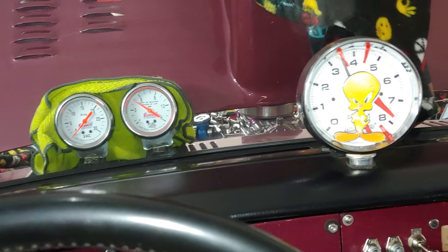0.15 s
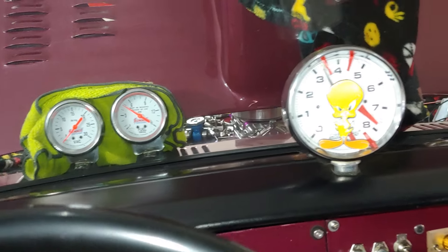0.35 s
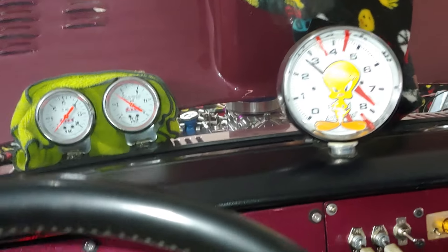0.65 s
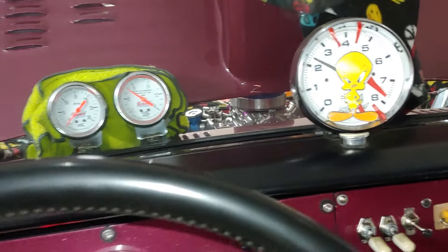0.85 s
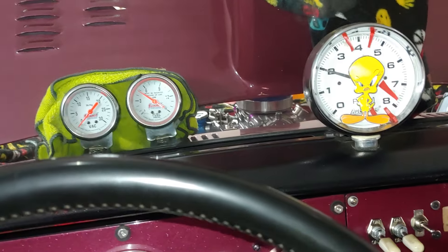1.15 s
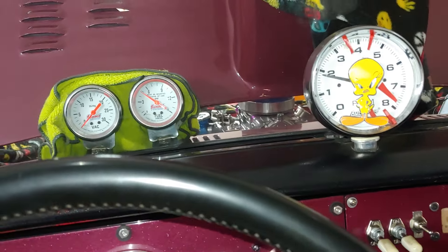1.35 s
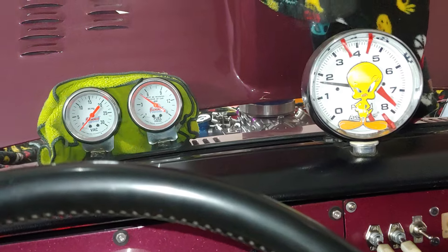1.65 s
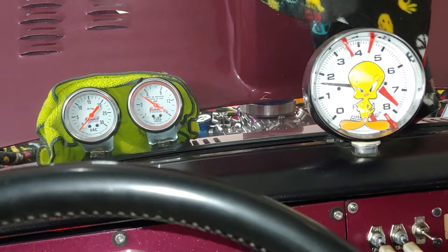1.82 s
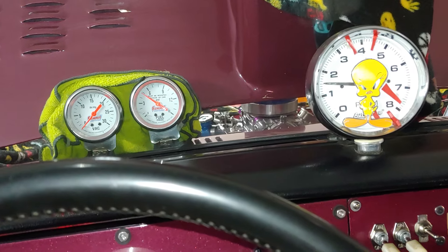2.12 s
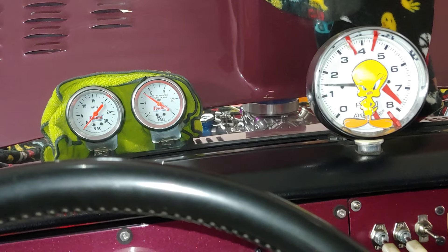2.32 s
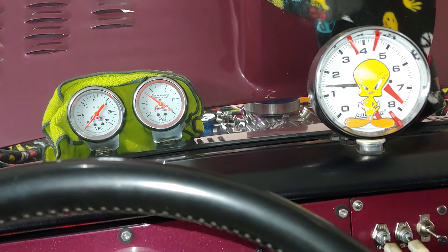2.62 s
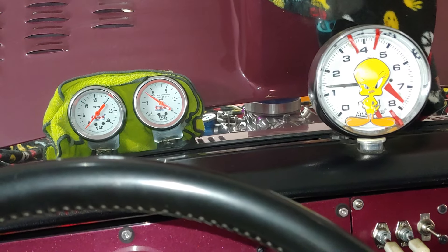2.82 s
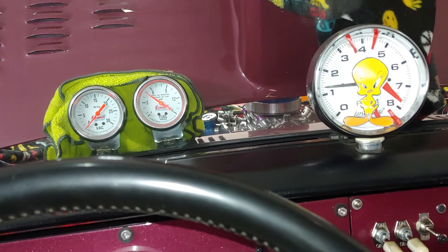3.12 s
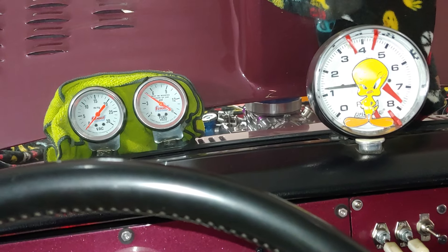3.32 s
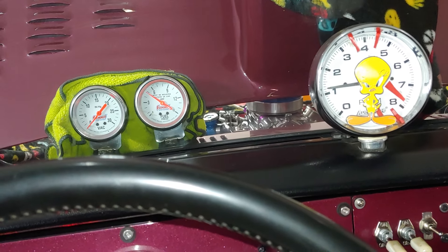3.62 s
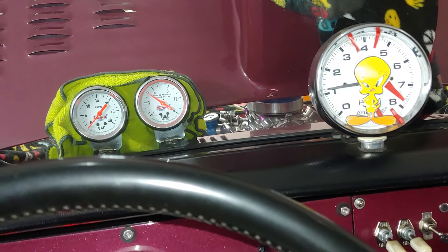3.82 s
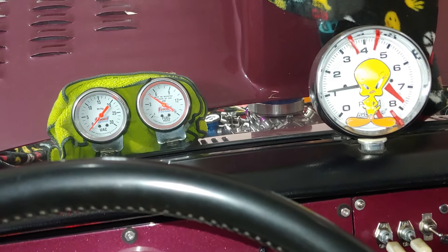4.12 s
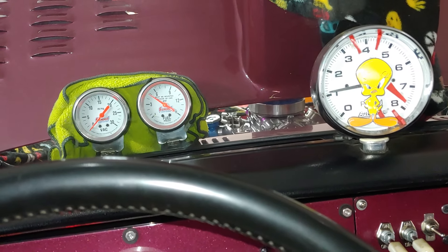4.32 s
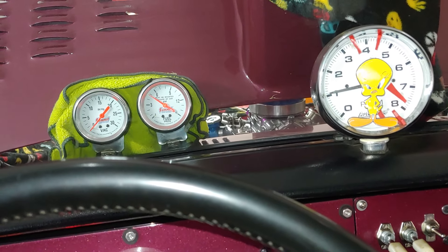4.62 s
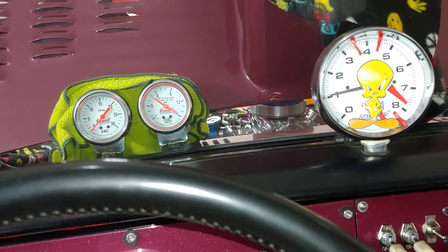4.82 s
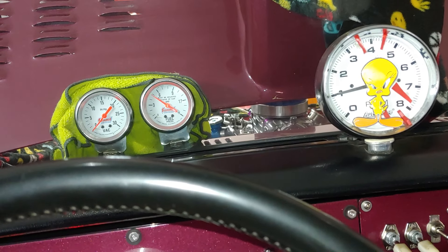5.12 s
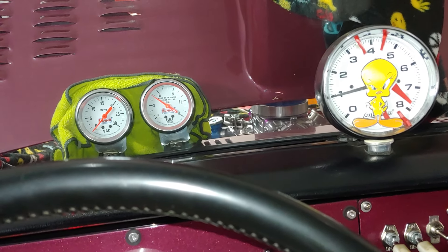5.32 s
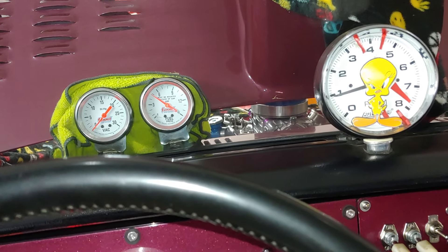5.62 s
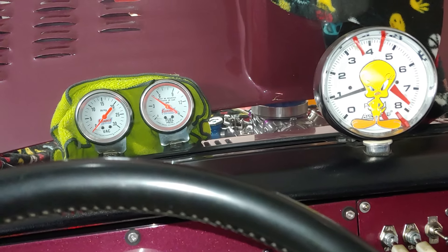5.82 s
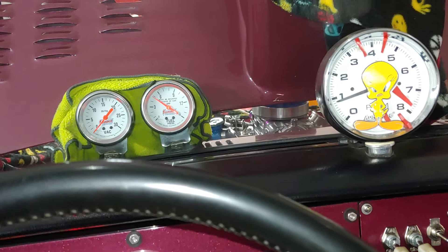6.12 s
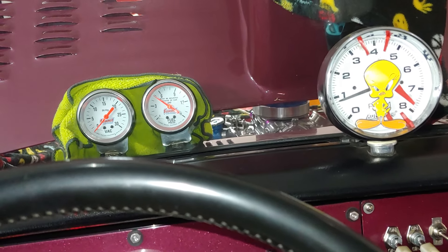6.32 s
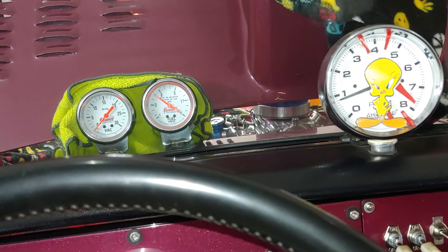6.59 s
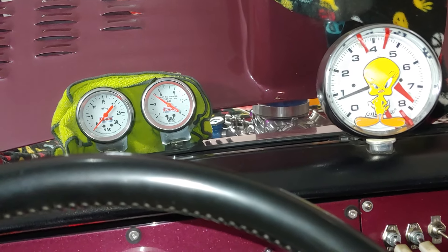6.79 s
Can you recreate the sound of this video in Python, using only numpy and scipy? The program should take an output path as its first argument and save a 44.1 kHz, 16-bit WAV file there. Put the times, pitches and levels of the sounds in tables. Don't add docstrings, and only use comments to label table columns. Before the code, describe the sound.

A rough eight-cylinder engine is blipped, falls in deep uneven throbs with sputtering backfires, and settles into a lumpy idle with rattling dash parts.

```python
import sys
import numpy as np
from scipy import signal
from scipy.fft import rfft, irfft, next_fast_len
from scipy.io import wavfile
from scipy.ndimage import uniform_filter1d

SR = 44100
rng = np.random.default_rng(int(sys.argv[2]) if len(sys.argv) > 2 else 0)


def makeup_ratio(level_db):
    decades = np.asarray(level_db, float) / 20
    return 10 ** decades


def unload_wav(signal):
    wavfile.write(
        sys.argv[1],
        SR,
        np.round(np.clip(np.atleast_2d(signal).T, -1, 1) * 32767).astype(np.int16),
    )


N = 306495


def unit(x):
    return x / np.sqrt(np.mean(x ** 2))


def band(x, f_hz, width_hz):
    return signal.lfilter(*signal.iirpeak(f_hz, f_hz / width_hz, fs=SR), x)


def resonate(x, modes):
    out = 0
    for k, (f_hz, width_hz, level_db) in enumerate(modes):
        out = out + (-1) ** k * makeup_ratio(level_db) * band(x, f_hz, width_hz)
    return out


def shelf(x, f_hz, kind, order=2):
    return signal.sosfilt(signal.butter(order, f_hz, kind, fs=SR, output="sos"), x)


def colour(x, points):
    f_hz, gain_db = np.transpose(points)
    size = next_fast_len(N)
    log_f = np.log(np.arange(size // 2 + 1) * SR / size + 1)
    gain = makeup_ratio(np.interp(log_f, np.log(f_hz), gain_db))
    return irfft(rfft(x, size) * gain, size)[:N]


def walk(rate_hz):
    hold = int(SR / rate_hz)
    steps = np.repeat(rng.standard_normal(N // hold + 1), hold)
    return 1.48 * uniform_filter1d(uniform_filter1d(steps, hold), hold)[:N]


def strikes(at_s, level_db):
    out = np.zeros(N)
    np.add.at(out, (np.asarray(at_s) * SR).astype(int), makeup_ratio(level_db))
    return out


def ring(f_hz, t60_s):
    t = np.arange(SR // 2) / SR
    return np.sin(2 * np.pi * f_hz * t) * (1 - np.exp(-t / 0.0013)) * makeup_ratio(-60 * t / t60_s)


def rattles(shake):
    # t/s, peak level/dB
    tick_table = [(3.5772, -18.5), (3.7713, -23), (3.9683, -34), (4.3629, -25), (4.6962, -23),
                  (4.9117, -17), (5.0384, -20), (5.2379, -21), (5.427, -34), (5.4614, -13), (5.5946, -23),
                  (5.869, -43), (5.887, -11.5), (5.9458, -21), (6.1429, -10.5), (6.2531, -17),
                  (6.309, -19.5), (6.3569, -33.5), (6.4113, -22), (6.4327, -18), (6.4936, -19),
                  (6.544, -18.5), (6.6397, -11), (6.6966, -15), (6.7245, -18.5), (6.7445, -13.5),
                  (6.7759, -35), (6.8318, -36), (6.8508, -26), (6.9006, -11.5)]
    # t/s, peak level/dB, f/Hz
    ping_table = [
        (4.92, -48, 3620),
        (5.14, -43, 3620),
        (5.37, -44, 3620),
        (6.14, -45, 3530),
        (6.63, -46, 3620),
    ]
    chatter = (rng.random(N) < 120 / SR) * rng.standard_normal(N) * shake * makeup_ratio(-8.0)
    blows = strikes(*np.transpose(tick_table)) + chatter
    bracket = ring(2045., 0.083) + .5 * ring(2120., 0.04)
    ticks = signal.fftconvolve(blows, bracket)[:N]
    pings = np.zeros(N)
    for at_s, level_db, f_hz in ping_table:
        pings += signal.fftconvolve(strikes([at_s], level_db), ring(f_hz, 0.41))[:N]
    return ticks * makeup_ratio([[-14], [-6]]) + pings


def spits(column, rise_ms, fall_ms):
    # t/s, treble peak level/dB, body over peak/dB, panel ring over peak/dB
    spit_table = np.array([(0.661, -28, 3, -12), (1.18, -35, -7, -8), (1.4007, -35, -1, 9),
                           (1.589, -31.5, 21, -1), (2.115, -26, 14, -24), (2.429, -37, 12, -14),
                           (2.598, -26, 7, 7.5), (2.8665, -31, 16, 6), (3.118, -27, -4, 3),
                           (3.1874, -27, -4, -19), (3.3704, -25.5, 3, -3), (3.7589, -23.5, -1, 1.5),
                           (3.8462, -38.5, -2.5, -6), (3.966, -24, 2.5, 0), (4.357, -27.5, -10, -12),
                           (4.699, -27.5, -5, -6.5), (4.9117, -27.5, 6.5, 4.5), (5.1374, -29, 0, 6),
                           (5.2326, -30, -10.5, -2), (5.684, -35, 7, -15), (5.869, -20, -9, -11),
                           (5.975, -27, 14, -5), (6.135, -24, 17, 4.5), (6.299, -28, 14, -6),
                           (6.4107, -18, -3, 4.5), (6.4991, -27.5, 0, -3), (6.601, -15, 5.5, -0.5),
                           (6.659, -26.5, -11, 3), (6.728, -33, -2, -4), (6.857, -38, -7, -17)])
    level_db = spit_table[:, 1] + (spit_table[:, column] if column else 0)
    ms = np.arange(SR // 6) / SR * 1000
    puff = (1 - np.exp(-ms / rise_ms)) * np.exp(-(ms / fall_ms) ** 2)
    return signal.fftconvolve(strikes(spit_table[:, 0], level_db), puff)[:N]


def port(points, body, treble, shake, shared):
    # f/Hz, width/Hz, level/dB
    panel_modes = [(718, 26, 0), (900, 45, -2), (975, 40, -3), (1280, 60, -7), (1740, 140, -4),
                   (2030, 60, -3), (2375, 55, -6), (2800, 60, -6), (3390, 50, -9), (4020, 50, -8)]
    air = rng.standard_normal(N)
    common = shelf(shared + .5 * air, 416.0, "lowpass")
    air = shelf(air, 263.0, "highpass") + common + 0.14 * shared
    low = shelf(air * body, 5000., "lowpass", order=1) * makeup_ratio(walk(30))
    high = shelf(air * treble, 8200.0, "highpass", order=1) * makeup_ratio(walk(10))
    panels = resonate((shared + 0.41 * air) * shake, panel_modes)
    return colour(low + high + makeup_ratio(4) * panels, points) * makeup_ratio(56.5)


def firings(rate_hz, imbalance):
    bank_signs = np.array([1, -1, -1, 1, -1, 1, 1, -1])
    turns = np.cumsum(rate_hz) / SR
    count = np.arange(int(turns[-1]))
    jitter, luck = rng.standard_normal((N // 100, 2))[count].T
    at = np.interp(count + .025 * jitter, turns, np.arange(N)).astype(int)
    strength = makeup_ratio(2.0 * luck)
    share = np.clip(imbalance[at], 0, 1)
    balance = (1 - share + share * bank_signs[count % 8]) / np.hypot(share, 1 - share)
    pulses = np.zeros(N)
    np.add.at(pulses, at, strength * balance)
    latest = strength[np.minimum(turns.astype(int), count[-1])]
    gate = latest ** 0.33 * (0.64 + .5 * np.exp(-(turns % 1) / 0.19))
    return pulses / np.sqrt(rate_hz), gate


def exhaust(pulses, upper_db):
    # f/Hz, width/Hz, level/dB
    pipe_modes = [(133.3, 58.8, 8), (185.3, 31.2, 8), (229, 17.5, -8), (304.2, 17.5, -6),
                  (360.4, 20.3, -13.5), (422, 70, -17)]
    drive = unit(pulses) + 0.45 * rng.standard_normal(N)
    lower = shelf(resonate(drive, pipe_modes[:2]), 105.6, "highpass", order=6)
    upper = shelf(resonate(drive, pipe_modes[2:]), 170.0, "highpass", order=4)
    t = np.arange(SR // 5) / SR
    both, apart = rng.standard_normal((2, len(t))) * makeup_ratio(-60 * t / .22)
    both[0] = 45
    ports = []
    for side in (1, -1):
        cab = both + side * 0.38 * apart
        low = unit(signal.fftconvolve(lower, cab)[:N])
        high = unit(signal.fftconvolve(upper, cab)[:N])
        low = shelf(low, 238.0, "lowpass", order=4)
        ports.append(low + makeup_ratio(upper_db) * shelf(high, 312.0, "lowpass"))
    return np.array(ports)


def kick(t, at_s, level_db, f_hz, length_ms, phase):
    near = slice(max(int((at_s - .15) * SR), 0), int((at_s + .15) * SR))
    late_s = t[near] - at_s
    width_s = length_ms / 1000 * np.where(late_s < 0, .7, 1.3)
    envelope = np.exp(-(late_s / width_s) ** 2)
    out = np.zeros(N)
    out[near] = makeup_ratio(level_db) * envelope * np.cos(2 * np.pi * f_hz * late_s + phase)
    return out


def rumble(f_hz, width_hz):
    return unit(band(band(rng.standard_normal(N), f_hz, width_hz), f_hz, width_hz))


def boom(t, rate_hz):
    # f/Hz, peak level/dB
    cab_points = [(50, -15.5), (60, -8.5), (67, -8.5), (73, -2.5), (84, -2.5), (92, -6), (100, -19),
                  (112, -50)]
    # t/s, peak level/dB, f/Hz, length/ms
    thump_table = [(0.192, -6.1, 78, 22), (0.345, -10.5, 84, 60), (0.442, -6.1, 78, 60),
                   (0.546, -6.3, 78, 32), (0.704, -3.7, 78, 32), (0.862, -9.4, 57, 32),
                   (0.875, -6.8, 75, 60), (0.999, -6.2, 54, 22), (1.022, -5.3, 81, 60),
                   (1.052, -12.4, 75, 60), (1.06, -11.9, 87, 45), (1.241, -5.8, 72, 60),
                   (1.308, -8.9, 81, 45), (1.414, -4.3, 84, 32), (1.447, -10.7, 69, 60),
                   (1.5, -4.8, 87, 45), (1.629, -12.4, 72, 60), (1.636, -1.3, 81, 45),
                   (1.752, -0.8, 78, 45), (1.875, -5.5, 81, 45), (1.969, -10.8, 84, 60),
                   (2.01, -1.6, 78, 60), (2.039, -12.6, 75, 60), (2.218, -3.3, 75, 60),
                   (2.308, -6.0, 69, 45), (2.458, -9.0, 90, 32), (2.458, -6.2, 72, 60),
                   (2.582, -8.0, 78, 45), (2.67, -10.1, 87, 60), (2.697, -6.1, 75, 60)]
    # t/s, peak level/dB, f/Hz
    kick_table = [(2.88, -6.7, 75), (2.938, -11.5, 84), (3.063, -9.3, 72), (3.201, -6.5, 69),
                  (3.42, -9.4, 69), (3.998, -10.8, 72), (4.803, -12.5, 87), (4.931, -12.1, 81),
                  (5.185, -7.8, 81), (5.466, -11.6, 51), (5.478, -8.5, 81), (5.533, -7.4, 75),
                  (5.616, -10.4, 72), (5.713, -8.2, 78), (5.786, -5.6, 78), (5.887, -10.2, 57),
                  (5.976, -11.6, 63), (6.101, -12.5, 81), (6.154, -4.5, 75), (6.204, -11.1, 81),
                  (6.323, -4.8, 72), (6.372, -8.1, 81), (6.427, -6.1, 69), (6.527, -11.9, 60),
                  (6.638, -7.8, 69), (6.701, -3.5, 81), (6.864, -2.7, 78), (6.898, -8.1, 54),
                  (6.924, -5.2, 81), (6.944, -5, 75)]
    # t/s, peak level/dB, f/Hz
    misfire_table = [(2.806, -11.3, 84), (2.995, -8.8, 81), (3.107, -7.4, 75), (3.303, -11.9, 75),
                     (3.361, -9.3, 72), (3.637, -12.4, 69), (4.087, -10.7, 75), (4.82, -11.9, 66),
                     (4.98, -7.3, 84), (5.051, -6.7, 87), (5.229, -12.0, 87), (5.324, -11.2, 87),
                     (5.42, -11.1, 78), (5.576, -3.6, 75), (5.681, -2.6, 81), (5.748, -11.2, 63),
                     (5.924, -7.4, 69), (6.018, -4.6, 78), (6.063, -7.1, 81), (6.241, -5.6, 78),
                     (6.38, -10.1, 51), (6.56, -7.0, 69), (6.594, -10.3, 81), (6.778, -11.4, 69),
                     (6.822, -10.7, 54)]
    kick_ms, thump_db = 22, 0.5
    shell_db, lump_db, rumble_db = -15, -16.5, -36.5
    duck_share = 0.95

    phase = 2 * np.pi * np.cumsum(rate_hz) / SR
    cab_hz, cab_db = np.transpose(cab_points)
    tone = makeup_ratio(np.interp(np.log(rate_hz), np.log(cab_hz), cab_db))
    air = tone * np.cos(phase)
    for row in thump_table:
        air = air + makeup_ratio(thump_db) * kick(t, *row, 0.)
    for table, turn in ((kick_table, 0.), (misfire_table, np.pi)):
        for row in table:
            air = air + kick(t, *row, kick_ms, phase[int(row[0] * SR)] + turn)
    shell = rumble(47.6, 20.0) * uniform_filter1d(np.abs(air), size=6000) * np.pi / 2
    loose = np.clip(1 - duck_share * tone, 0, 1)
    lumps = makeup_ratio(shell_db) * shell + makeup_ratio(lump_db) * rumble(74.4, 26.7)
    return air + loose * lumps + makeup_ratio(rumble_db) * rumble(57., 28.0)


def scene():
    # t/s, firing rate f/Hz
    speed_points = [(0, 193), (.2, 240), (.43, 213), (.55, 195), (.9, 155), (1.2, 135), (1.5, 120),
                    (2, 107), (2.6, 96), (3, 91.5), (3.5, 85), (4, 80), (4.5, 76), (5, 71), (5.5, 66),
                    (6, 59), (6.5, 54), (6.95, 52)]
    # t/s, intake level/dB, exhaust level/dB
    layer_points = [(0, -22.5, -7.5), (0.152, -24.5, -8), (.24, -26.5, -20.5), (0.449, -24.5, -17),
                    (.68, -26, -11.5), (.78, -29, -15.5), (1.5, -29, -17), (1.7, -32, -21),
                    (2.6, -32, -14.5), (3.0, -35, -20), (3.9, -39, -27), (4.849, -39, -28.5),
                    (5.4, -33.5, -25), (5.75, -35.5, -22), (5.9, -32, -23.5), (6.3, -35, -30),
                    (6.65, -32.5, -28.5), (6.95, -32.5, -30.5)]
    # base level/dB, share of intake level, slope over idle/(dB/octave), open throttle
    # extra/dB
    upper_law = (-2, 0.94, 2, 7)
    hiss_law = (0, 1., 1, 0)
    treble_law = (-37, 0.23, 2.5, 12)
    # f/Hz, level/(dB/Hz)
    left_points = [(100, -65), (250, -61), (550, -55), (1200, -52.5), (1550, -66.5), (2100, -59.5),
                   (4000, -64.5), (7500, -81), (8400, -93.5), (9800, -75.5), (10300, -78), (11500, -67),
                   (12300, -76.5), (13000, -100)]
    right_points = [(100, -75), (250, -78), (550, -53.5), (1200, -52), (1450, -56), (2000, -47),
                    (2600, -57), (4000, -67.5), (6000, -69.5), (7000, -56), (8200, -72.5), (9100, -86.5),
                    (10000, -80.5), (15700, -86)]
    throttle_shut_s, throttle_fall_s, idle_hz = 0.12, 0.16, 63

    t = np.arange(N) / SR
    rate_hz = np.interp(t, *np.transpose(speed_points))
    at_s, intake_db, pressure_db = np.transpose(layer_points)
    noise_db = np.interp(t, at_s, intake_db)
    pipe_db = np.interp(t, at_s, pressure_db)
    throttle = np.exp(-np.maximum(t - throttle_shut_s, 0) / throttle_fall_s)
    octaves = np.log2(rate_hz / idle_hz)
    upper_db, hiss_db, treble_db = (
        base + share * noise_db + slope * octaves + wide * throttle
        for base, share, slope, wide in (upper_law, hiss_law, treble_law))

    pulses, gate = firings(rate_hz, 0.62 + 0.049 * walk(5.4))
    hiss = makeup_ratio(hiss_db + 9.0) * gate
    body = hiss + makeup_ratio(-12.5) * spits(2, 5.7, 33.0)
    treble = makeup_ratio(treble_db + 22.5) * gate ** 0.2 + makeup_ratio(1.5) * spits(0, 0.74, 35.)
    shake = hiss + makeup_ratio(-4.5) * spits(3, 1.0, 37.0)
    shared = rng.standard_normal(N)
    air = np.array([port(p, body, treble, shake, shared) for p in (left_points, right_points)])
    pipes = exhaust(pulses, upper_db - pipe_db) * makeup_ratio(pipe_db)
    return boom(t, rate_hz) * makeup_ratio([[-.8], [.8]]) + pipes + air + rattles(shake)


def roll_off(x):
    return signal.sosfilt(signal.butter(12, 15750, fs=SR, output="sos"), x)


def record(dry):
    held = dry / (1 + np.abs(dry / 1.02) ** 8) ** (1 / 8)
    return roll_off(held)


dry = scene()
out = record(dry)
unload_wav(out)
```